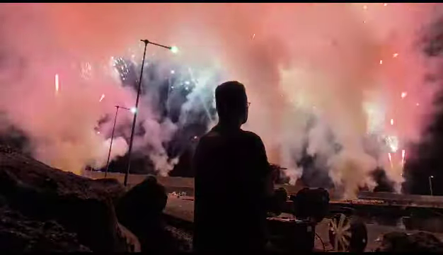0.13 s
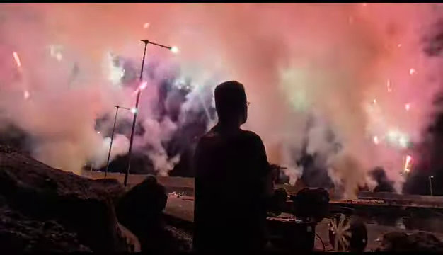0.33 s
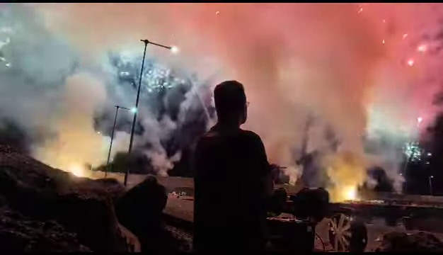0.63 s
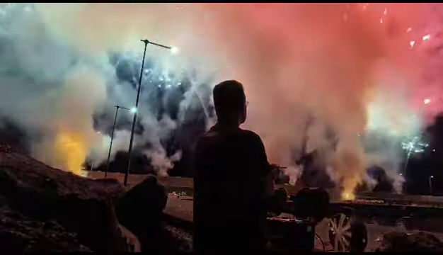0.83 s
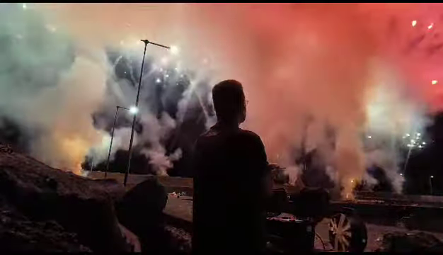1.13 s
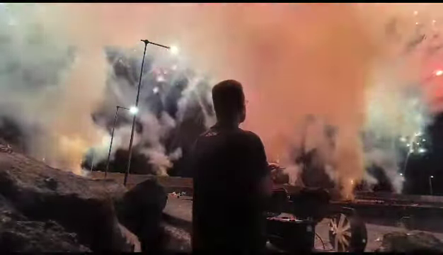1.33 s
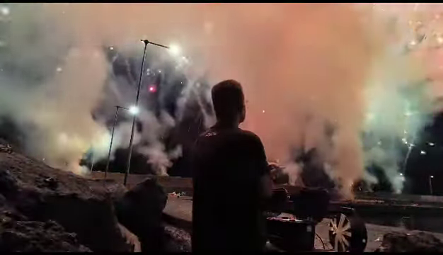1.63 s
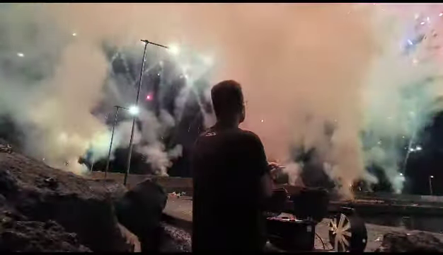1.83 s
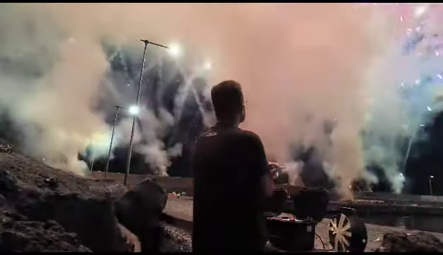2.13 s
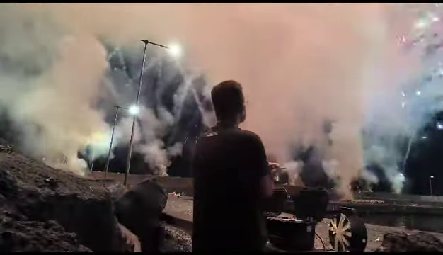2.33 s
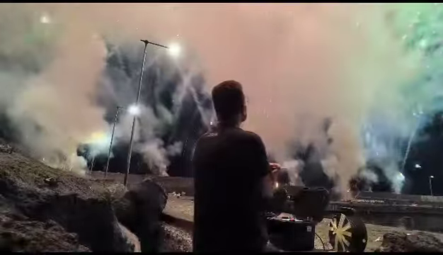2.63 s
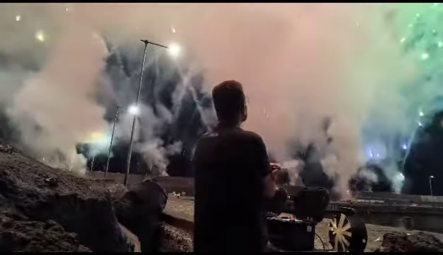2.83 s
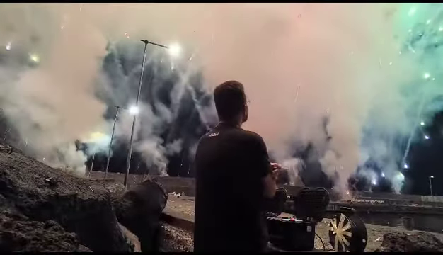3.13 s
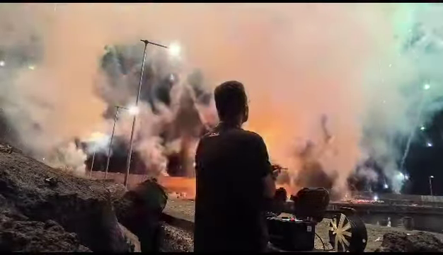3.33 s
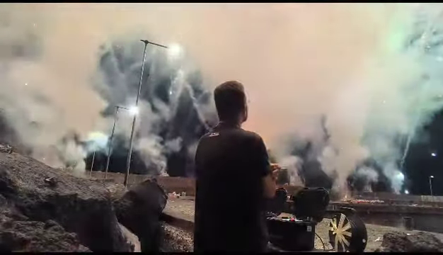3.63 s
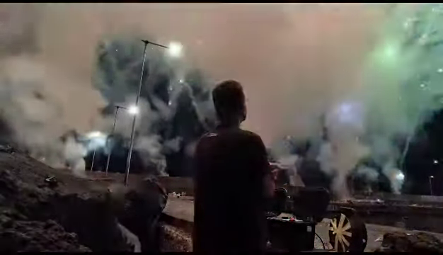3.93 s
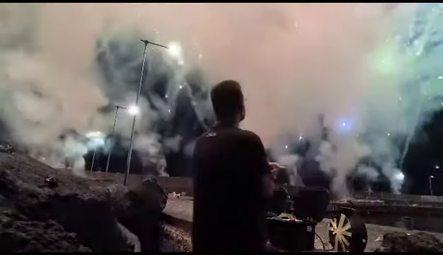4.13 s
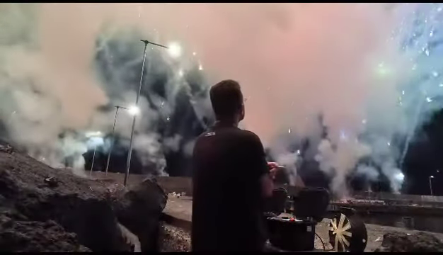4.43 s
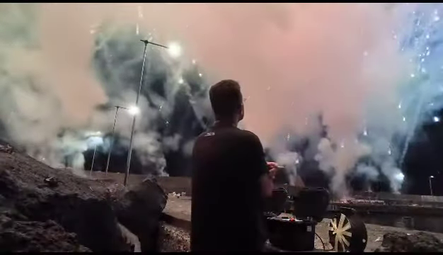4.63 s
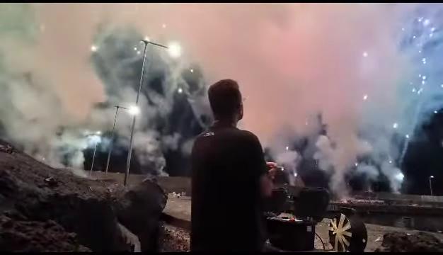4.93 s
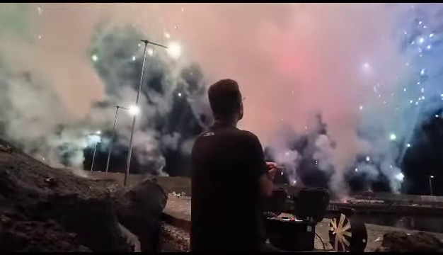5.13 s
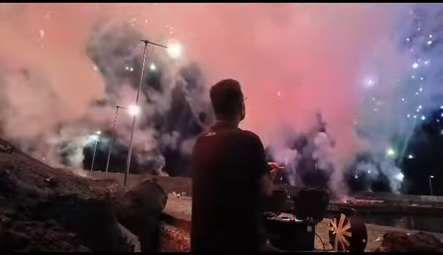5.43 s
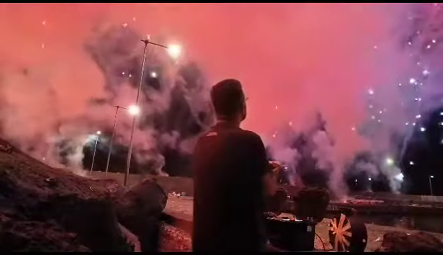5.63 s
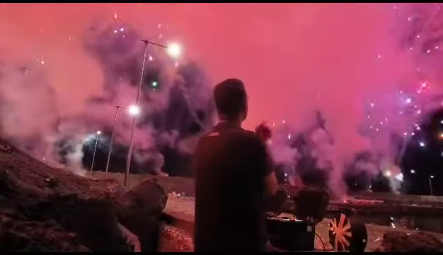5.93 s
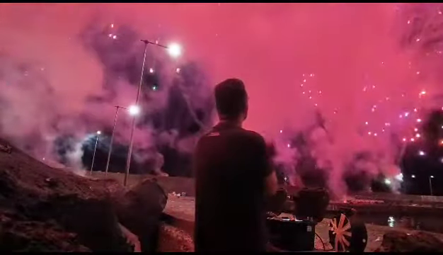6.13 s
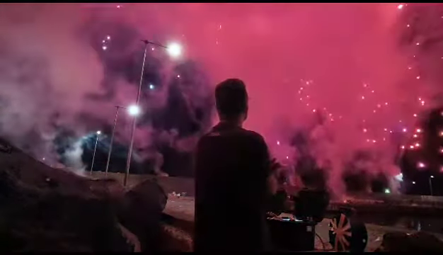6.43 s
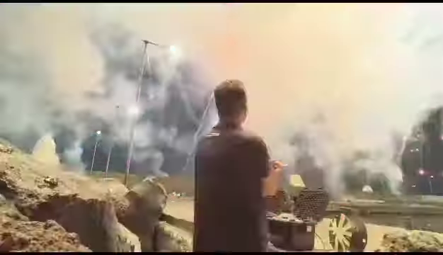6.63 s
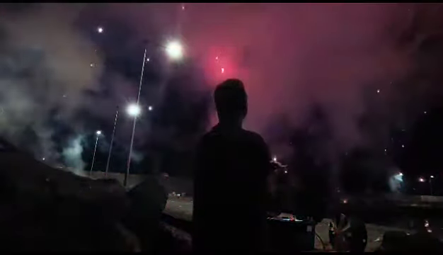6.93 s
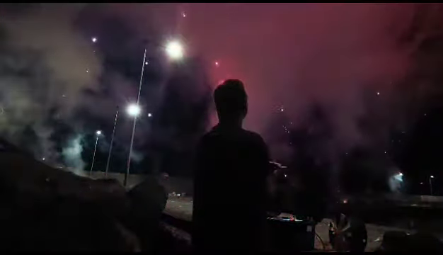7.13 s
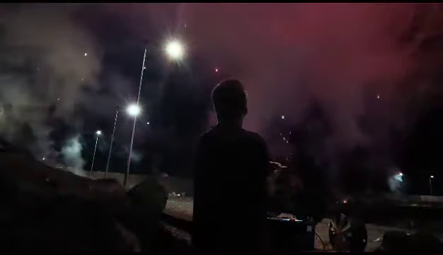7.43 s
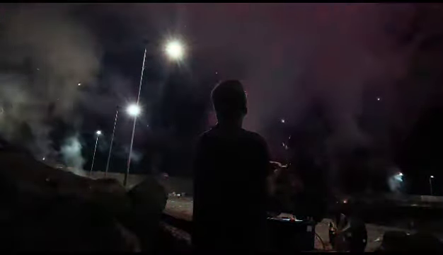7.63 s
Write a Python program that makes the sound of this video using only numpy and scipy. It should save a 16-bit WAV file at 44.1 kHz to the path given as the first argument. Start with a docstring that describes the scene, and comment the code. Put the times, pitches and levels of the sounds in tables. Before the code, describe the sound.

Fireworks at close range outdoors at night. From 0 to 0.6 s, sharp bangs pile up irregularly, densest from 0.3 s, with hissing cracks, short scattered echoes and hollow ringing from ground and walls; stars sizzle and fade. Around 0.9 to 1.0 s come duller, bassy booms, then a rumbling gap. A fierce rapid salvo runs from 1.54 to 2.13 s, followed by far rumble and crackle. Bangs return at 2.8 to 2.9 s, a tight volley at 3.04 to 3.28 s, a heavy boom at 3.57 s, and another chattering salvo from 4.0 to 4.55 s ending in deep thuds. From 4.6 to 7.5 s only low distant thuds, rumble and faint crackle remain, with weak muffled pops near 5.0 and 5.8 s. At 7.55 s a powerful cluster bursts with deep bass, trailing off by 7.8 s. The microphones saturate, and automatic gain dips under the bangs, then slowly recovers.

```python
"""Fireworks shells bang close by at night, singly and in fast salvos: each is a pressure pulse with suction,
scattered echoes, ringing from ground and walls, and a hissing crack. A few booms are sagging low sines.
Far charges off to the right thud, rumble and crackle, and burning stars sizzle: all noise and random pops.
Two spaced microphones overload on the bangs and the gain control turns down under them."""
import sys
import numpy as np
from scipy import signal
from scipy.fft import rfft, irfft
from scipy.io import wavfile
from scipy.ndimage import uniform_filter1d

SR = 44100
rng = np.random.default_rng(int(sys.argv[2]) if len(sys.argv) > 2 else 0)


def put_to_file(sound):
    """Save the sound as 16-bit audio at rate SR, in the file named by the first command-line argument."""
    columns = np.atleast_2d(sound).T  # one column per channel
    safe = np.clip(columns, -1, 1)
    whole_steps = np.round(safe * 32767)
    wavfile.write(sys.argv[1], SR, whole_steps.astype(np.int16))


N = 343098


def gain_of(db):
    """Decibels to a factor."""
    return 10 ** (np.asarray(db) / 20)


def evened(x):
    """Scales to rms 1."""
    return x / np.sqrt(np.mean(x ** 2) + 1e-20)


def read(points, hz):
    """Reads a spectrum on a log-frequency axis."""
    f, value = np.transpose(points)
    return np.interp(np.log(hz + 1), np.log(f + 1), value)


def add(mix, s, sound):
    """Mixes a two-channel sound in at time s."""
    part = mix[:, round(s * SR):][:, :sound.shape[1]]
    part += sound[:, :part.shape[1]]


def colour(x, points, size=8192):
    """Causal filter of the given spectral shape, scaled to unit energy: the phase follows from the log gain."""
    hz = abs(np.fft.fftfreq(size, 1 / SR))
    log_gain = np.log(gain_of(read(points, hz)))
    taps = np.fft.ifft(np.exp(np.conj(signal.hilbert(log_gain)))).real[:size // 2]
    taps /= np.linalg.norm(taps)
    return signal.oaconvolve(x, taps[None], axes=1)[:, :N]


def ring(x, hz, width):
    """A two-pole resonance of peak gain 1."""
    return signal.lfilter(*signal.iirpeak(hz, hz / width, SR), x)


def dulled(x, hz):
    """Takes the treble off, as air does: two gentle low-passes."""
    r = np.exp(-2 * np.pi * hz / SR)
    return signal.lfilter([(1 - r) ** 2], [1, -2 * r, r ** 2], x)


def far(points, per_s, spread_db, hiss):
    """Many far pops of uneven size and their blur; the left microphone hears them late, and partly others."""
    # likeness of left and right: f/Hz, likeness (0 to 1)
    likeness = [(60, 1), (300, 1), (700, 0.37), (1400, 0.79), (4000, 0.1), (15000, 0.36)]
    left_lag_ms = 0.45
    sizes = gain_of(spread_db * np.minimum(rng.exponential(1, (2, N)), 4))
    pops = rng.standard_normal((2, N)) * sizes
    pops = evened(pops * (rng.random((2, N)) < per_s / SR))
    pops += hiss * rng.standard_normal((2, N))
    hz = np.fft.rfftfreq(N, 1 / SR)
    right, other = rfft(pops)
    same = np.clip(read(likeness, hz), 0, 1)
    late = np.exp(-2j * np.pi * hz * left_lag_ms / 1000)
    left = late * (same * right + np.sqrt(1 - same ** 2) * other)
    return evened(colour(irfft([left, right], N), points))


def background():
    """Thuds, rumble and crackle of the far charges, and the sizzle of burning stars overhead."""
    # loudness curves of the far charges: t/s, thud level/dB, rumble level/dB
    far_levels = [(0, -20, -24), (.65, -35, -18), (1, -46, -21), (1.5, -30, -25.5), (2.2, -39, -17),
                  (2.5, -58, -22), (2.8, -24, -23), (3.35, -35, -17), (3.8, -31, -22), (4.6, -17.5, -17.5),
                  (5.201, -25, -24.5), (5.6, -24.5, -25), (6.7, -27.5, -26.5), (7.1, -26.5, -21),
                  (7.53, -23.5, -24), (7.6, -11, -12), (7.78, -30, -23)]
    # stars light up, sizzle and die out: t/s, sizzle level/dB, crackle level/dB, fade/(dB/s)
    star_levels = [(0, -31.5, -32.5, 7.5), (3.04, -44.5, -50, 8), (4.22, -45, -42, 10.5),
                   (7.55, -34.5, -38, 76)]
    # spectral shapes of the four layers: f/Hz, relative level/dB
    thud_shape, rumble_shape = [(15, -22), (28, -7.5), (55, -0.5), (80, 3), (130, -9), (300, -78)], [(30, -36.5), (70, -12.5), (125, -0.5), (230, -2.5),
                                              (354, -10), (650, -15), (1000, -21.5), (1500, -42.5),
                                              (3000, -70)]
    crackle_shape, sizzle_shape = [(300, -35.5), (900, -4.5), (1300, 2.5), (2200, 0.5), (3000, -10.5),
                                   (3900, -9.5), (6200, -30.5), (8000, -47), (16000, -82.5)], [(1500, -35.5), (3000, 6), (5000, 0.5), (7000, -5),
                                                    (9000, -8.5), (12000, -14.5), (16000, -30)]
    t = np.arange(N) / SR
    s, *levels_db = np.transpose(far_levels)
    thud, rumble = (gain_of(np.interp(t, s, db)) for db in levels_db)
    star_power = np.zeros((2, N))
    for lit, *db, fade_db in star_levels:
        star_power += (t >= lit) * gain_of(np.array(db)[:, None] - fade_db * (t - lit)) ** 2
    stars, popping = np.sqrt(star_power)
    crackle = np.hypot(gain_of(-23) * rumble, popping)  # the far crackle rides on the rumble
    mix = thud * far(thud_shape, per_s=47, spread_db=1.5, hiss=1.16)
    mix += rumble * far(rumble_shape, per_s=300, spread_db=2.5, hiss=2.0)
    mix += crackle * far(crackle_shape, per_s=250, spread_db=4.5, hiss=1.8)
    mix += stars * far(sizzle_shape, per_s=1800, spread_db=-0.5, hiss=4.0)
    return mix


def pressure_pulse(after, crack_db):
    """The blast wave: a sudden pressure rise that decays through zero into suction."""
    # a shell that cracks faintly is farther off and its pulse longer
    shortest_ms, near_ms, near_crack_db, stretch_ms_per_db = 0.435, 0.87, -16.5, 0.15
    pulse_ms = max(near_ms + stretch_ms_per_db * (near_crack_db - crack_db), shortest_ms)
    u = after / pulse_ms
    pulse = (after > 0) * (1 - u) * np.exp(-u)
    return dulled(pulse, hz=2500 / pulse_ms ** 2)  # long pulses have rounded fronts


def scattered(pulse, size, count=30):
    """Echoes of a pulse at random delays, weaker the later, each from its own side."""
    where, side, strength = rng.random((count, 3)).T
    delay_ms = 2.5 + 90 * where ** 1.5
    at = (delay_ms + 0.19 * np.outer([1, -1], side - .5)) * SR / 1000
    at = np.clip(at, 0, size - 1).astype(int)
    taps = np.zeros((2, size))
    np.put_along_axis(taps, at, (2 * strength - 1) * gain_of(-.32 * delay_ms), 1)
    return signal.fftconvolve(pulse[:, :size // 2], taps, axes=1)


def crack_hiss(after, crack_db, lag_ms, size):
    """The noise of a bursting casing, partly shared by the microphones."""
    *own, shared = rng.standard_normal((3, size))
    delayed = np.roll(shared, round(lag_ms * SR / 1000))
    hiss = 0.52 * np.array(own) + 0.43 * np.array([delayed, shared])
    # a faint crack comes from far off and has lost its treble
    hiss = dulled(hiss, hz=22000 * gain_of(1.4 * min(crack_db + 32, 0)))
    hiss *= np.clip(after / .15, 0, 1)
    # every casing cracks with its own colour
    return hiss + 1.52 * ring(hiss, hz=1200 * 5.54 ** rng.random(), width=800)


def bangs(size=6000):
    """Each shell: a pressure pulse, its echoes and ringing off the site, and a hissing crack with a tail."""
    # shells: t/s, relative blast level/dB, relative crack level/dB, left microphone lag/ms
    shells = [(0.02, 1, -14, 0.18), (0.0656, 2, -17.5, 0.27), (0.1306, -2.5, -33, 0.19),
              (0.1381, -3.5, -15, .21), (0.1651, -13.5, -18.5, -0.19), (0.283, 4.5, -17.5, 0.18),
              (0.317, 9, -12, -0.28), (0.3261, 9.5, -14.5, -0.43), (0.3344, 0, -19, -.06),
              (0.3733, 6, -14.5, 0.24), (0.4249, 3.5, -16, -0.27), (0.4423, 5.5, -15.5, -0.39),
              (0.466, 3, -14.5, 0.35), (0.486, 6, -18.5, 0.19), (0.5536, 3.5, -14.5, -0.38),
              (0.56, 10, -18, -0.22), (0.6143, -7, -21, 0.31), (0.907, -5.5, -24, -0.11),
              (0.926, -3.5, -35.5, -0.00072), (0.985, -3.5, -32, -0.14), (0.993, -8, -30, -.43),
              (1.5425, 5, -15.5, 0.26), (1.5632, 5, -18, 0.24), (1.576, 11, -15.5, 0.32),
              (1.5817, 1, -26, .21), (1.7561, 4, -16.5, 0.21), (1.775, 9, -19.5, -.45),
              (1.7892, 4, -14, -0.31), (1.814, 1.5, -18, 0.26), (1.832, 1.5, -17, -0.32),
              (1.8537, 0.5, -19.5, 0.19), (1.8832, 4, -22, -0.32), (1.911, 8, -18.5, -.38),
              (1.9472, -4, -22, -.41), (1.967, 6, -18, 0.23), (1.9838, 3, -19, 0.077),
              (2.0223, 4, -27, .45), (2.0588, -2.5, -21, -.05), (2.0784, 2, -18.5, -.24),
              (2.1278, 1.5, -19.5, -.08), (2.8189, 5, -18.5, 0.28), (2.8579, 3.5, -16, 0.26),
              (2.9101, 0.5, -19, 0.22), (3.039, 6.5, -20, 0.28), (3.0665, 0.5, -27, -0.31),
              (3.1024, -6.5, -19, 0.53), (3.119, 1, -17, .29), (3.1342, 6.5, -17.5, -0.59),
              (3.163, 4.5, -16, 0.29), (3.2012, -2.5, -18, 0.076), (3.2331, 2, -18, -0.028),
              (3.2817, -2.5, -23.5, 0), (3.564, -6, -25.5, 0.15), (3.5686, 5.5, -15, 0.16),
              (3.5791, 7.5, -18, -0.19), (3.6078, 3, -24, -0.069), (4.0137, 0, -23, 0.22),
              (4.0998, 3.5, -19, 0.23), (4.1183, -1, -24.5, 0.37), (4.1569, -3.5, -23, -0.54),
              (4.1932, 1, -20.5, 0.25), (4.224, -2, -23, 0.14), (4.2349, 0, -26, -0.3),
              (4.2779, 3, -24, -0.25), (4.3056, -1.5, -20, .56), (4.3199, -0.5, -20, -0.14),
              (4.3699, -5.5, -29, -0.3), (4.4241, 0, -24, -.09), (4.4457, -3.5, -26.5, 0.12),
              (4.546, -2, -18.5, 0.25), (4.987, -13, -38, .51), (5.78, -14, -43, .42),
              (5.818, -28, -41.5, .52), (6.257, -35, -43, 0.48), (6.972, -29, -42.5, 0.34),
              (7.155, -23, -41.5, .53), (7.385, -25, -43, 0.28), (7.5418, 2.5, -18.5, -0.052),
              (7.5457, 4, -16.5, -0.41), (7.555, -1, -21, -0.56), (7.565, -5.5, -25.5, 0.17),
              (7.65, 1.5, -39.5, 0.27), (7.7474, -5.5, -36, 0.15)]
    # ground and walls ring: f/Hz, width/Hz, relative level/dB
    site = [(129, 43, -8), (225, 65.3, 2), (378, 870, -13), (660, 66, -3)]
    # the opening shells ring higher too: until t/s, f/Hz, width/Hz, relative level/dB
    until, opening_hz, opening_width, opening_db = (0.7, 390, 146, -1)
    # spectral shape of the cracks: f/Hz, relative level/dB
    crack_shape = [(300, -36), (800, 2.5), (2000, 3), (4000, -2), (7000, -7), (10000, -5.5), (16000, -8.5)]
    blasts, echoes, cracks, tails = np.zeros((4, 2, N))
    for s, blast_db, crack_db, lag_ms in list(shells) + fill():
        lags_ms = np.array([[lag_ms / 2], [-lag_ms / 2]])
        # ms since the front; the sound is laid in 1 ms early to leave room for the lags
        after = np.maximum(np.arange(size) * 1000 / SR - lags_ms - 1, 0)
        start = s - .001
        pulse = gain_of(blast_db) * pressure_pulse(after, crack_db)
        add(blasts, start, pulse)
        add(echoes, start, scattered(pulse, size))
        hiss = gain_of(crack_db) * crack_hiss(after, crack_db, lag_ms, size)
        # a sharp decay, then a slower one
        add(cracks, start, (gain_of(-1.0 - 8.6 * after) + gain_of(-12.0 - 0.72 * after)) * hiss)
        add(tails, start, gain_of(-11.5 - 0.56 * after) * hiss)
    # small shells push little deep bass
    blasts, echoes = (x - dulled(x, hz=45.5) for x in (blasts, echoes))
    echoes = dulled(echoes, hz=1500)
    struck = blasts + gain_of(-3.0) * echoes
    rung = sum(gain_of(db) * ring(struck, hz, width) for hz, width, db in site)
    opening = blasts * (np.arange(N) < until * SR)
    rung += gain_of(opening_db) * ring(opening, opening_hz, opening_width)
    treble = gain_of(3.5) * colour(cracks + dulled(tails, hz=3480), crack_shape)
    return gain_of(-8.5) * blasts + gain_of(-9) * echoes + gain_of(5.5) * rung + treble


def booms(size=900):
    """Heavy shells felt as low thuds: sines whose pitch sags and wavers as they die."""
    # thuds: t/s, level/dB, settled pitch f/Hz, time to fall 60 dB/s
    thuds = [(0.024, -24, 54, 0.35), (0.903, -7, 53.8, 0.47), (0.979, -10.5, 118.3, 0.16),
             (1.55, -8, 56.7, 0.33), (3.577, -1, 85.4, 0.33), (4.46, -4.5, 54.5, 0.38),
             (4.558, -3, 52, 0.61), (7.555, 6, 117.2, 0.24), (7.586, 5.5, 42, 0.22),
             (7.648, -3.5, 107.5, 0.22), (7.661, 1.5, 43.7, 0.27), (7.759, -7, 45, 0.11)]
    out, t = np.zeros((2, N)), np.arange(SR // 2) / SR
    for s, db, hz, t60 in thuds:
        waver = evened(uniform_filter1d(rng.standard_normal(len(t)), size))
        pitch_hz = hz * (1 + .4 * np.exp(-t / .012) + .07 * waver)
        thud = gain_of(db - 60 * t / t60) * np.sin(2 * np.pi * np.cumsum(pitch_hz) / SR)
        add(out, s, thud * gain_of([[.6], [-.6]]))  # slightly to the left
    return out


def fill():
    """More shells, as rows for bangs: one at random in each slot of a salvo, weaker as it burns down."""
    # salvos: start t/s, end t/s, relative blast level/dB, relative crack level/dB
    salvos = [(1.764, 1.99, 2, -20), (3.048, 3.28, 1.5, -20.5), (4.221, 4.446, 2.5, -18.5)]
    per_s, fade_db_per_s, spread_db, lag_ms = 75, 7.5, 5, 0.45
    rows = []
    for start, end, blast_db, crack_db in salvos:
        slots = np.arange(start, end, 1 / per_s)
        when, weakness, side = rng.random((len(slots), 3)).T
        loss_db = spread_db * weakness + fade_db_per_s * (slots - start)
        rows += zip(slots + when / per_s, blast_db - loss_db, crack_db - loss_db, lag_ms * (2 * side - 1))
    return rows


def scene():
    """All charges together."""
    return background() + gain_of(5.5) * bangs() + booms()


def record(dry, start_db=4.0, deaf_hz=140, size=8192):
    """Microphones saturate; gain control, deaf to low bass, sinks with the power and climbs back steadily."""
    # microphone response: f/Hz, level/dB
    response = [(15, -10.5), (35, -4), (1000, -2.5), (3000, -3.5), (7000, -4), (8500, -12), (11000, -11),
                (14500, -3), (17000, -7.5)]
    ceiling, knee = 1.13, 4.5  # the microphones' limit and how sharply it sets in
    fall_db, recover_db, lag_s = 150, 6.2, .07  # dB/s down per unit power, dB/s back up, sluggishness in s
    edge_hz = 15800  # upper band edge
    limited = dry / (1 + abs(dry / ceiling) ** knee) ** (1 / knee)
    clipped = colour(limited, response, size)
    # colour() scales to unit energy: restore the level of the response
    gains = gain_of(read(response, np.fft.rfftfreq(size, 1 / SR)))
    clipped *= np.sqrt(np.mean(gains ** 2))
    sensed = signal.lfilter(*signal.butter(2, deaf_hz, "high", fs=SR), clipped)
    r = np.exp(-1 / (lag_s * SR))
    power = signal.lfilter([1 - r], [1, -r], (sensed ** 2).mean(0))
    drift_db = start_db + np.cumsum(fall_db * power - recover_db) / SR
    # the turn-down never goes below 0 dB
    down_db = drift_db - np.minimum(np.minimum.accumulate(drift_db), 0)
    edge = signal.firwin(255, edge_hz, window=("kaiser", 9), fs=SR)
    return signal.oaconvolve(clipped / gain_of(down_db), edge[None], "same")


dry = scene()
out = record(dry)
put_to_file(out)
```